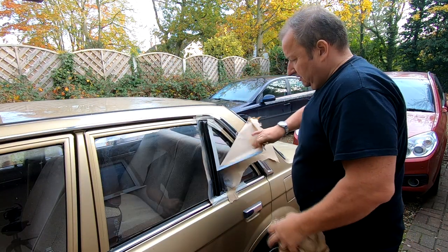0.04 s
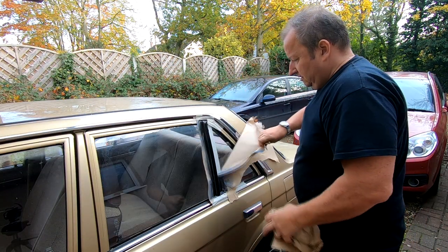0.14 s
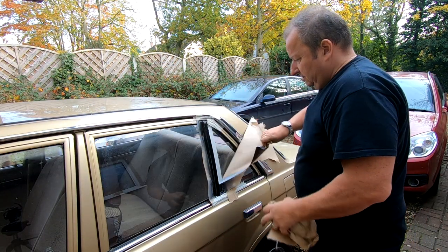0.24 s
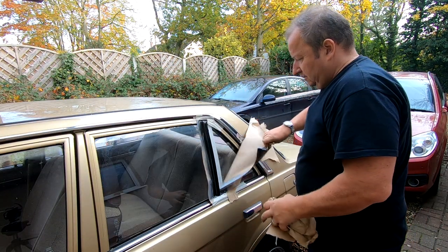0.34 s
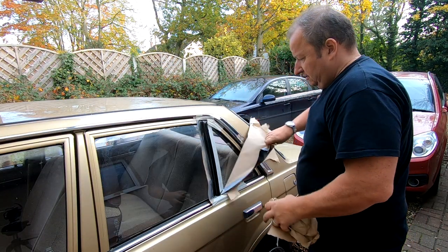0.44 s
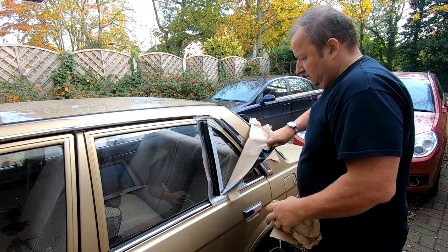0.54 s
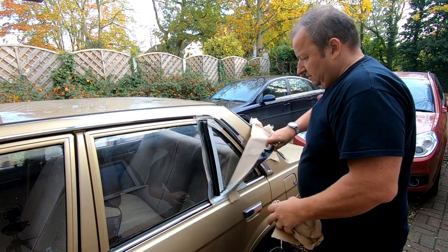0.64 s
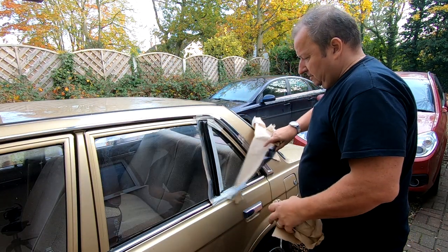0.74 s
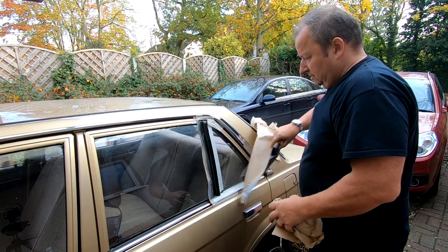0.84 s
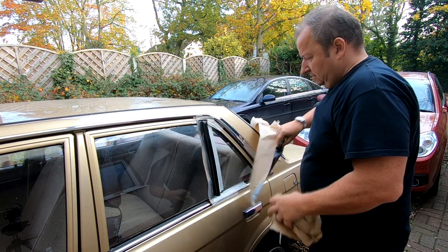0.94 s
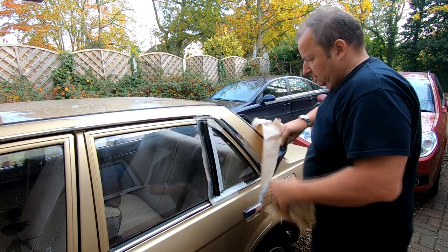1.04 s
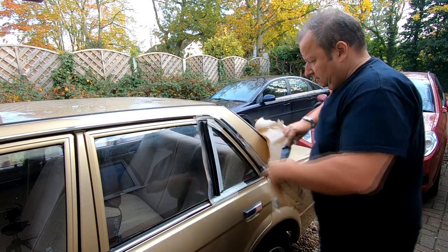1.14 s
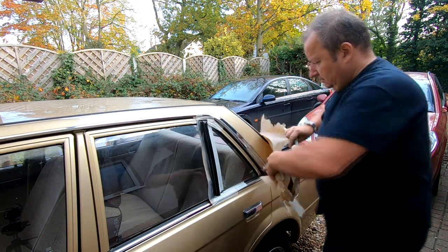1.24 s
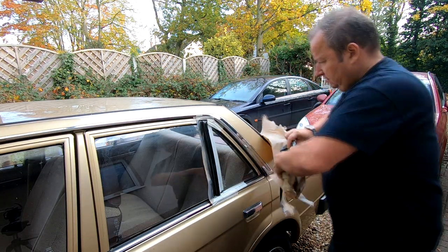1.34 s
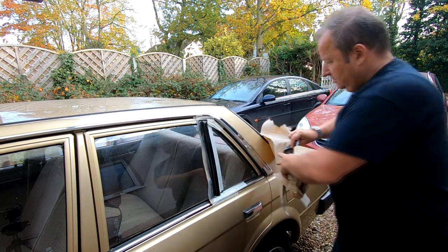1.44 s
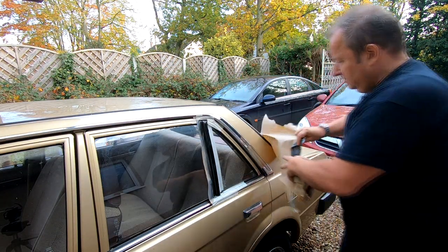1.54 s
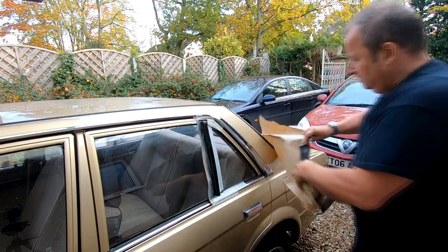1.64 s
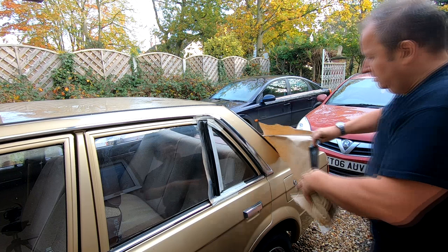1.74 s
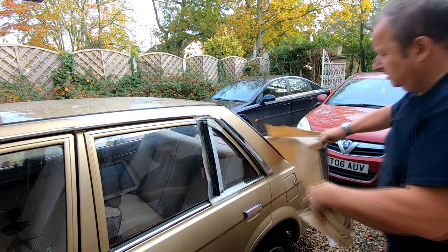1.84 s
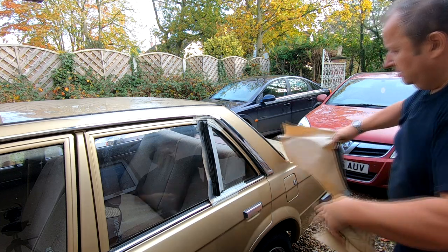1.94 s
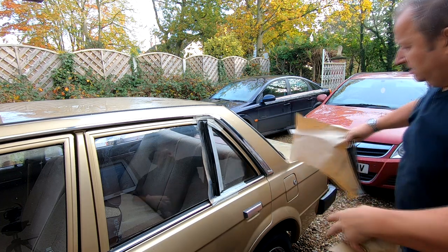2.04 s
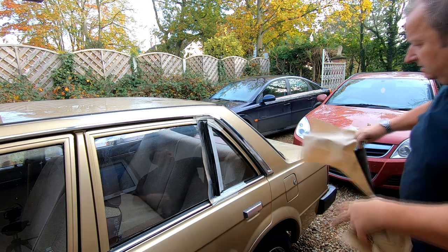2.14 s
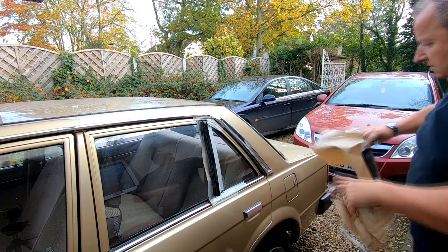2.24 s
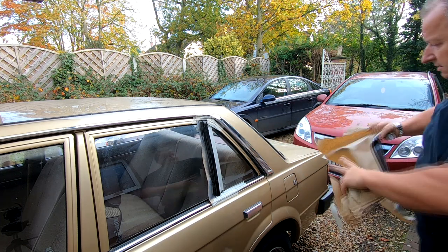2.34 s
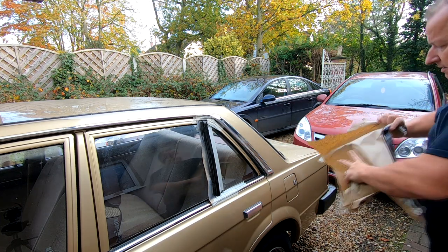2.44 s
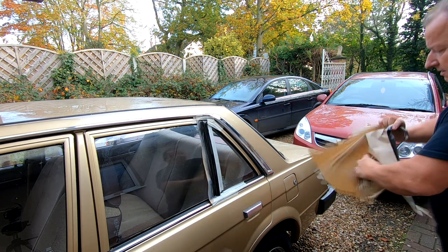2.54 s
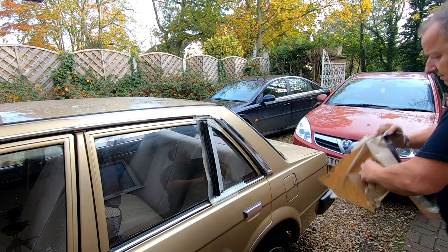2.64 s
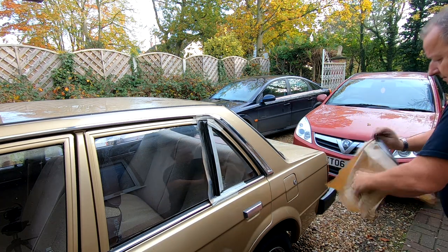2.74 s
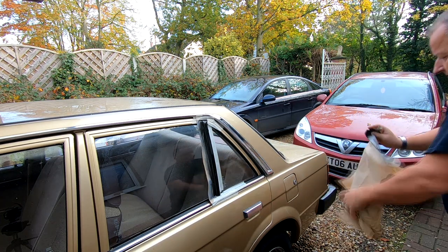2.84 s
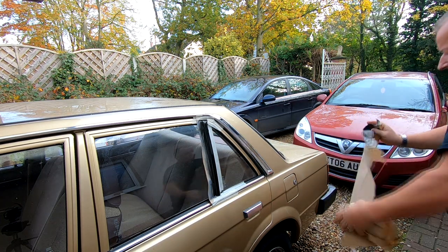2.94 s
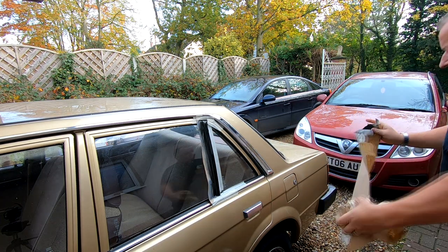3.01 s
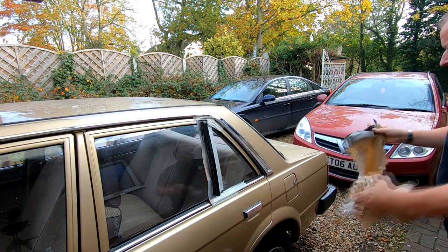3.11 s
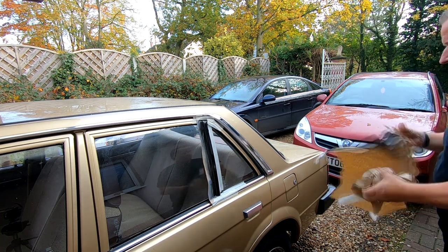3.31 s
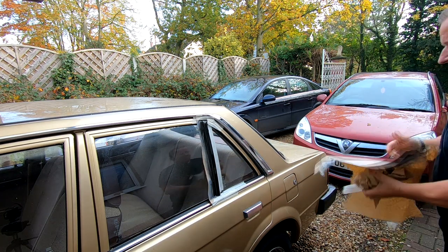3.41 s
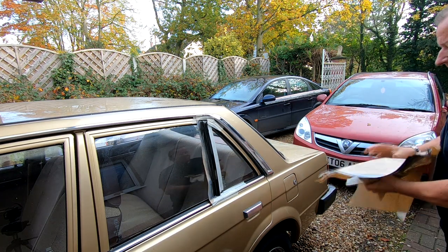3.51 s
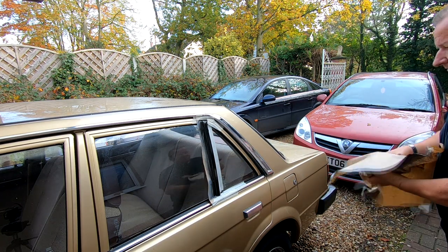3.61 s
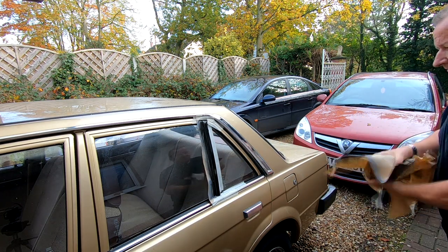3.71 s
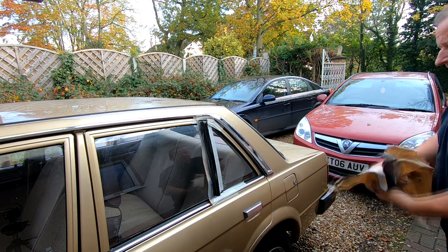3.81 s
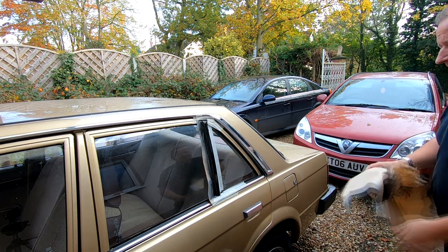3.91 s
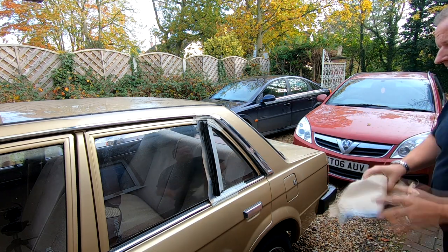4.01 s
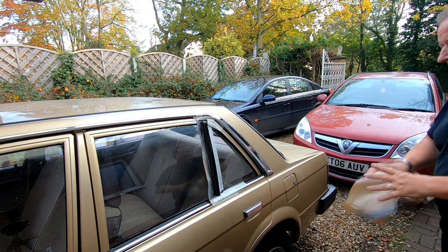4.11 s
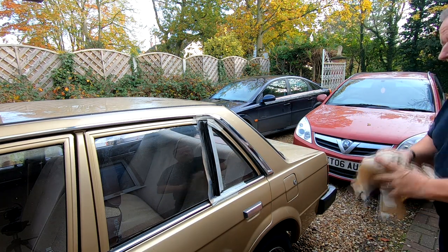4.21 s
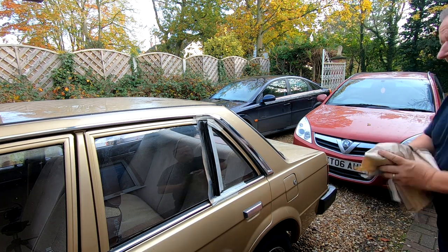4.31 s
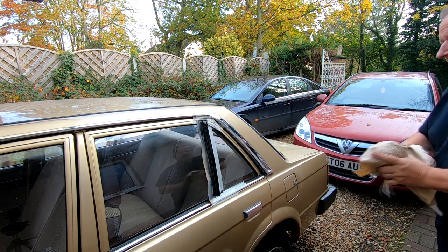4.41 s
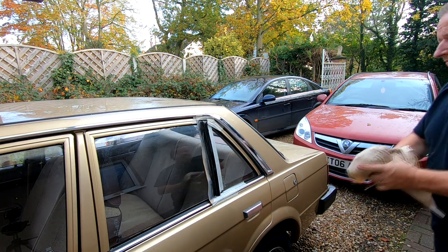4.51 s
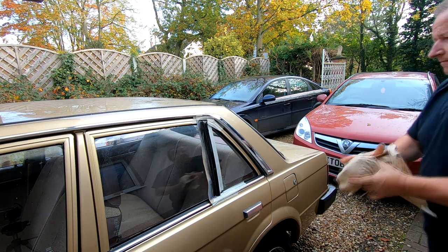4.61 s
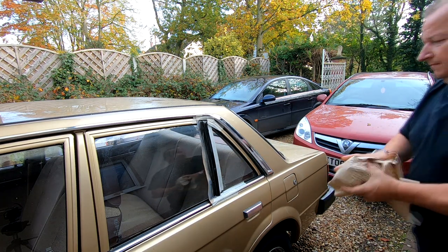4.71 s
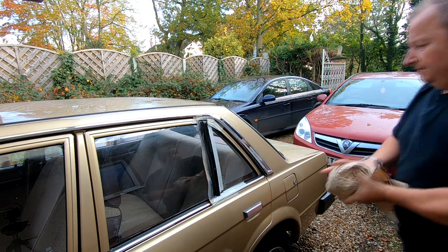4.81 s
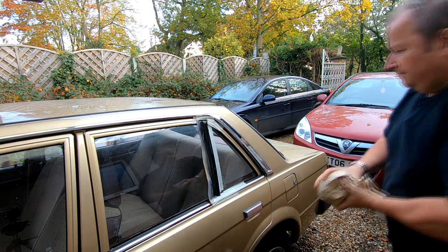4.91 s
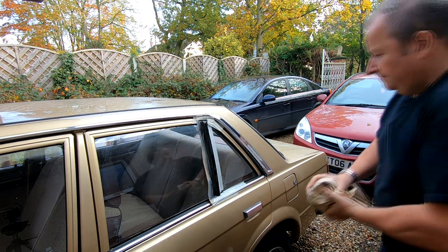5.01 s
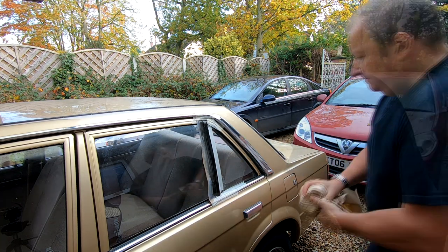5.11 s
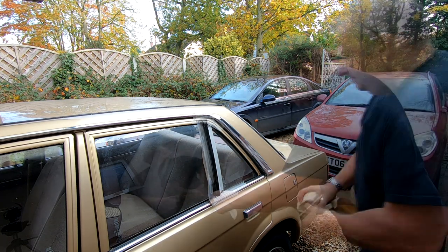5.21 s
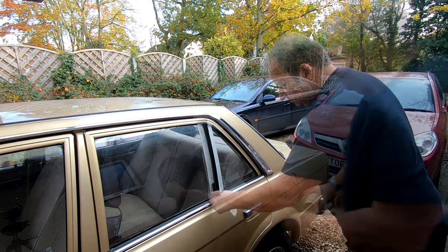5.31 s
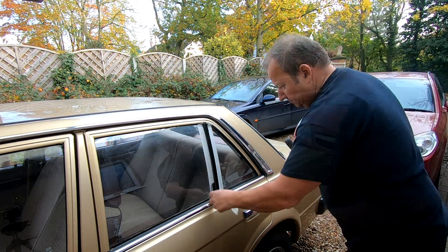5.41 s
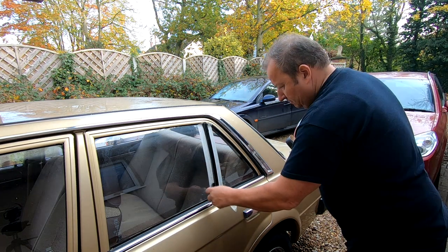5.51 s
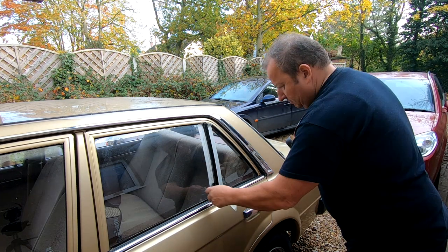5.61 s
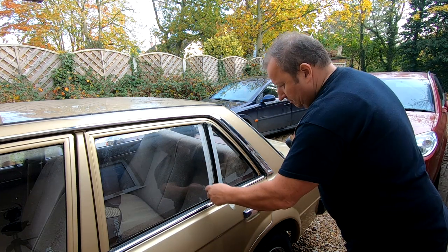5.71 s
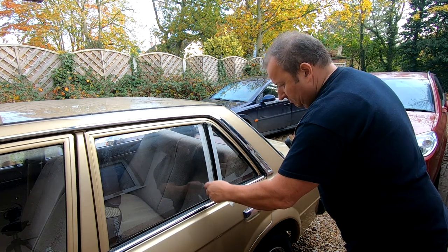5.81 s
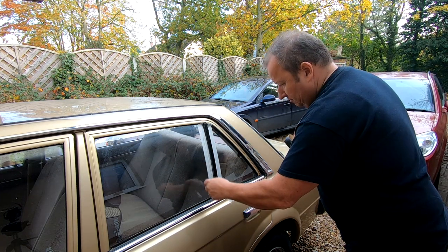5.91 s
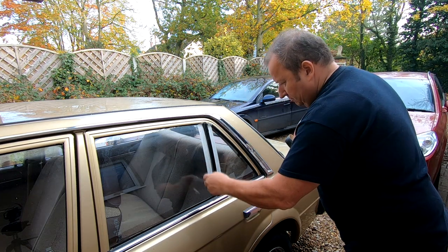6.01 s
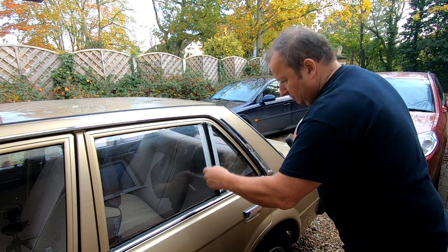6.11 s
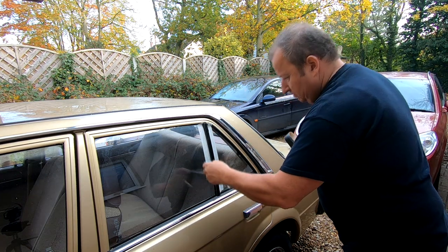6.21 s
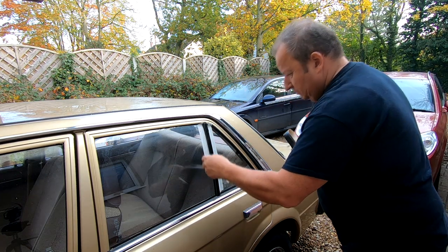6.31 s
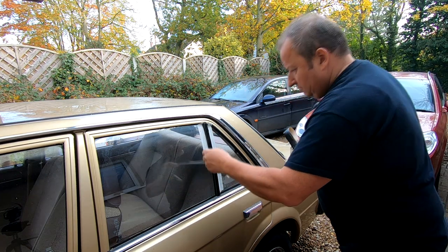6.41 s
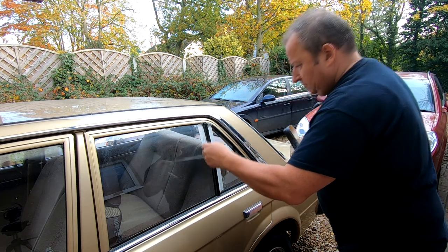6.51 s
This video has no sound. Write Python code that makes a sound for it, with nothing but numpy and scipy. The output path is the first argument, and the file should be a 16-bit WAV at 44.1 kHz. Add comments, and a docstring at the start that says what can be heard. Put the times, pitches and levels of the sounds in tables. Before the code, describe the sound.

Masking paper rustles and snaps as it is ripped off a car and crumpled by hand, then a strip of tape peels away.

```python
"""Masking paper is ripped off a car window frame and crumpled by hand on a driveway.
Creases buckle in clumps of tiny cracks, with louder snaps among them; each crack is an impulse that
excites the damped modes of the sheet. Paper slides over paper and pushes puffs of air. Then a strip of
tape is peeled: its glue threads fizz and the door panel drones. Far traffic hums below."""
import sys
import numpy as np
from scipy import signal
from scipy.fft import rfft, irfft
from scipy.io import wavfile

SR = 44100
rng = np.random.default_rng(int(sys.argv[2]) if len(sys.argv) > 2 else 0)


def store_pcm(level_fs):
    """Save levels as 16-bit WAV."""
    pcm = np.round(np.clip(level_fs, -1, 1) * 32767).astype(np.int16)
    wavfile.write(sys.argv[1], SR, np.atleast_2d(pcm).T)


N = 288855

# The sheet, from taut to balled up. Each row: time in seconds; crackle, edge and knock pitch in Hz;
# crackle level of the sheet merely held in dB; low boom and crisp treble in dB over that crackle.
SHEET = [(0, 2650, 6300, 650, -47.5, -12, 0), (.25, 2450, 6040, 724, -45, 6, -3),
         (.42, 2660, 6100, 800, -45.5, 2.5, -9), (.6, 2480, 5300, 750, -51, 5, -1),
         (.72, 2720, 5800, 744, -53, 2, -4), (.9, 2380, 5500, 750, -62.5, 10.5, -7),
         (1.25, 2500, 5400, 610, -64, 1, -11), (1.5, 2050, 6640, 547, -57, -0.5, -14),
         (1.75, 2460, 6140, 516, -35, 5.5, -11), (2.1, 2600, 5370, 510, -59.5, 1.5, -11),
         (2.55, 2390, 5600, 660, -52, -2.5, -12), (2.9, 1900, 6200, 596, -57, -3, -11),
         (3.3, 2200, 5960, 674, -45.5, -1, -11.5), (3.8, 2020, 6700, 676, -56, -8, -15),
         (4.1, 1930, 6840, 443, -60.5, 3, -18), (4.45, 2150, 7300, 477, -42, 2, -9),
         (4.75, 2250, 6600, 700, -48, -3, -10), (5.2, 2190, 6400, 690, -67, 0, -4),
         (5.35, 3200, 6250, 700, -58, -3, -2), (5.75, 3200, 6100, 700, -69, 1, -2.5)]
# Grips and pulls of the hands. Each row: start and hold in seconds, crackle level in dB, swell over
# the hold in dB, boom and crisp treble in dB over the crackle.
GRIPS = [(0, 0.12, -35.5, -10, -0.5, -14), (0.171, 0.084, -38.5, 11, -6.5, -5),
         (0.368, 0.11, -40, 0, -14, -5), (.58, 0.14, -44.5, 0, -2, -5), (0.71, 0.098, -30.5, 2, -6, -14.5),
         (1.075, 0.11, -49, 6, -2.5, -11.5), (1.231, 0.088, -43, -4.5, 2.5, -13),
         (1.615, 0.11, -48, 3, -6, -10.5), (1.737, .13, -33, -11, -18.5, -10.5),
         (1.872, 0.07, -32.5, 2, -5, -7), (1.943, 0.061, -38.5, -3, -2, -13), (2.536, .06, -40, 4, -2, -16),
         (2.601, 0.14, -38, -10.5, -2, -10.5), (3.27, 0.09, -46, 0, -2, -15),
         (3.439, 0.12, -40, 3, -2.5, -14.5), (3.595, 0.086, -37, 5, -0.5, -9.5),
         (3.707, 0.088, -28.5, 2.5, -0.5, -10), (3.839, 0.055, -34, -12, -2, -13),
         (3.901, 0.027, -42, 1.5, -2, -3.5), (3.966, .06, -49, -3.5, 2, -20),
         (4.239, 0.089, -31, -1, 0.5, -7.5), (4.336, 0.096, -35.5, 7, -1, -9.5),
         (4.495, 0.15, -37, 0.5, -3, -9.5), (4.686, 0.11, -33, 1, -3, -10.5),
         (4.823, .08, -24.5, -4.5, -5.5, -14.5), (4.904, 0.17, -31, -8, -1.5, -9),
         (5.07, 0.16, -49.5, 2.5, -1, -9), (5.515, 0.07, -55.5, 1, -3, -2)]
# Snaps along folds. Each row: start and length in seconds, crackle level in dB, low knock and
# crisp edge in dB over the crackle.
SNAPS = [(.068, 0.0027, -26.5, -21, -9), (0.092, 0.0021, -33, -19, -2), (0.151, 0.002, -33.5, -2, -4),
         (.1666, .01, -37, -5, -4), (0.18, 0.0026, -28.5, -5, -9), (0.2167, 0.0021, -25, -2.5, -25),
         (0.222, 0.0089, -24.5, -11, -15), (.236, 0.0033, -23, -13, -21),
         (0.2463, 0.032, -19, -11.5, -13.5), (0.2974, .011, -21.5, -10.5, -12.5),
         (0.3454, 0.0022, -27, 1, -22), (0.358, 0.011, -15.5, -14, -13),
         (0.386, 0.017, -18.5, -11.5, -13.5), (0.4095, 0.009, -19, -10, -16),
         (0.422, 0.022, -19.5, -16, -14), (0.4697, 0.0013, -21.5, -1, -10), (.485, 0.0071, -23, -6, -15),
         (0.517, .0024, -33, -13, -24), (.532, 0.002, -21.5, -6.5, -15), (0.547, 0.0019, -27, -11, -17),
         (0.584, .0031, -25, -7, -26), (0.594, 0.011, -24, -13, -29), (0.623, 0.0043, -27.5, -8, -16),
         (.6336, 0.0038, -26, -17, -27), (0.646, 0.0017, -24.5, -16, -23), (0.653, 0.0066, -27, -10.5, -23),
         (0.68, 0.00095, -24, -6, -20), (0.717, 0.018, -27, -9, -15), (0.743, 0.029, -27.5, -6, -20),
         (0.755, 0.0012, -20.5, -5, -30), (0.777, 0.0015, -15.5, -5, -34), (0.785, 0.011, -25.5, -6, -35),
         (0.799, 0.0015, -14.5, -8, -30), (0.8054, 0.0019, -18, -4, -23), (.8174, 0.016, -30.5, -12, -20),
         (0.8753, 0.0039, -28, -16, -13), (.943, .002, -42, -6, -15), (0.997, 0.0021, -35, -5, -25),
         (1.007, 0.0039, -35.5, -11, -20), (1.0316, 0.0028, -28.5, -4, -6), (1.054, 0.0024, -33, -1.5, -22),
         (1.08, .0131, -35, -0.5, -5.5), (1.102, .0027, -42, -12, 5), (1.152, 0.0085, -30.5, -21, -27),
         (1.227, 0.029, -27.5, -6, -12.5), (1.254, 0.02, -32, -6.5, -13), (1.304, 0.0046, -42, 1.5, -25),
         (1.35, 0.0018, -38, -10, -25), (1.412, 0.0026, -42, 2, -29), (1.454, 0.0066, -36.5, 7, -9),
         (1.5763, 0.0022, -28, -0.5, -1), (1.629, 0.0017, -27.5, 5, -4.5), (1.654, 0.0051, -37.5, -6, -2),
         (1.8768, 0.0043, -12, -7, -24), (1.888, 0.004, -16, -4, -22), (1.894, 0.0024, -13, -5, -18),
         (1.904, 0.011, -15, -2.5, -17), (1.9192, 0.02, -18.5, -8, -18), (2.203, 0.0052, -45, -2, -22),
         (2.248, .002, -48, -3, -4), (2.277, 0.0022, -43, -1, -10), (2.29, 0.0031, -39, -8, -19),
         (2.328, 0.0046, -42, -6, -11), (2.385, 0.0021, -40, 3, -19), (2.4276, 0.0048, -42.5, 1, -12),
         (2.518, 0.014, -34.5, -2, -20), (2.549, 0.03, -25, -6.5, -8.5), (2.572, 0.022, -27.5, -17, -16),
         (2.803, 0.0023, -35.5, -8, -19), (2.82, .003, -53, -5, -2), (2.84, 0.0074, -47.5, -5, -7),
         (2.9629, .0113, -48, -10, -20), (3.0364, .0045, -43.5, 9, -11), (3.0663, 0.0087, -39.5, -10, -12),
         (3.171, 0.0037, -39, -7, -27), (3.2017, 0.0021, -25, -14, -24), (3.308, 0.0038, -33.5, 4, -23),
         (3.324, 0.0029, -28, 1, -5.5), (3.334, 0.0056, -31.5, 2.5, -24), (3.344, 0.0059, -30.5, 2, -21),
         (3.359, .0032, -26.5, -15, -18), (3.426, 0.024, -28.5, -8, -11.5), (3.45, 0.0093, -30, -2, -10),
         (3.478, 0.0036, -23.5, -8, -16), (3.4866, 0.0033, -25, -11, -29), (3.531, 0.0013, -27.5, -3, -20),
         (3.5848, 0.012, -23, -7.5, -19), (3.6493, 0.012, -24.5, -7.5, -9.5), (3.6654, .02, -26, -3, -6.5),
         (3.692, 0.0014, -21, -6, -7), (3.7235, 0.0011, -21, -4, -7), (3.7496, 0.0051, -22.5, 3.5, -12),
         (3.7916, 0.0059, -26.5, -6, -9), (3.804, .0049, -34, 5.5, -17), (3.815, 0.0021, -25.5, 2, -20),
         (3.855, 0.002, -26.5, 2.5, -18), (3.904, 0.0032, -26, -6.5, -22), (3.927, 0.019, -39.5, -5, -11),
         (4.0866, 0.0087, -44, 4.5, -37), (4.182, 0.0052, -38.5, -10, -21), (4.209, 0.025, -21.5, -3, -16),
         (4.231, 0.0077, -19, -1.5, -10), (4.262, .0041, -21, -3, -13), (4.3023, 0.0026, -22.5, -15, -6),
         (4.3605, 0.006, -22.5, -6.5, -16), (4.3695, .002, -20.5, -6, -9),
         (4.3897, 0.0041, -14.5, -11.5, -13), (4.421, 0.0016, -23, -1, -5), (4.428, 0.0051, -20, 0, -13),
         (4.444, .006, -19.5, -3.5, -12), (4.469, 0.0028, -21.5, -9, -14), (4.56, .004, -26.5, -6.5, -12),
         (4.581, 0.0074, -23, -9, -21), (4.625, 0.0015, -20.5, 3, -15), (4.635, 0.008, -29, -3.5, -10),
         (4.708, 0.0071, -27.5, -3.5, -10), (4.7372, 0.0028, -18, -8, -9.5),
         (4.7685, 0.0024, -26.5, 1, -24), (4.784, 0.0082, -21.5, -5, -15), (4.8672, 0.025, -22, -10, -8),
         (4.9624, 0.0016, -21, -2.5, -13), (4.989, 0.0011, -20.5, -1, -10),
         (5.0845, 0.0015, -30, -4.5, -2.5), (5.182, 0.019, -37, -7, -11.5), (5.236, 0.0046, -48, 5, 4),
         (5.2472, 0.0028, -56, 6, -4), (5.3537, 0.0048, -56, 11, 10), (5.372, 0.0049, -60, 11, 1),
         (5.3985, .0043, -61, 7, 11), (5.423, .003, -62, -1, 9), (5.438, .003, -61, 1, 6),
         (5.486, 0.0024, -54, 6, 5), (5.5084, 0.037, -46, 6, 4), (5.545, 0.024, -44, 2, 3.5)]
# A taut sheet rings in a narrow band, a crumpled one in a broad band.
# Each row: time in seconds, spread about the crackle pitch in octaves.
CRACKLE_SPREAD = [(0, 0.26), (.9, 0.12), (1.2, 0.49), (2, 0.26), (3, 0.52), (5.75, 0.51)]
# Spectra of the paper's low boom and crisp treble. Each row: frequency in Hz, relative level in dB.
BOOM_SPECTRUM = [(70, -15.5), (150, -9), (400, 0.5), (1000, 0), (1500, 1), (3000, -47)]
CRISP_SPECTRUM = [(3000, -14), (4800, 12.5), (7000, 4), (9000, -3), (12000, -9), (16000, -21)]
# Paper sliding over paper. Each row: start and length in seconds, pitch in Hz, level in dB.
SLIDES = [(1.64, 0.14, 7550, -51.5), (2.697, 0.087, 7500, -76), (2.837, 0.074, 8850, -71),
          (3.06, 0.075, 10500, -69), (3.22, .08, 10500, -72), (5.058, .1, 7600, -64),
          (5.275, .2, 6550, -70), (5.513, 0.067, 6540, -44)]
# Air pushed by the flapping sheet. Each row: start in seconds, level in dB.
PUFFS = [(.29, -53), (.44, -52), (.75, -68), (1.24, -45), (1.59, -48), (1.9, -43), (2.21, -53), (2.6, -52),
         (3.12, -50), (3.47, -41.5), (3.59, -41), (3.79, -36), (3.94, -48), (4.23, -30), (4.46, -45),
         (4.89, -38), (5.22, -50), (5.53, -56)]
# Tape peeled off the pillar. Each row: time in seconds, hiss level in dB, panel drone level in dB.
PEEL = [(5.68, -75, -73), (5.72, -59.5, -64), (5.78, -49, -51), (5.91, -53.5, -54), (5.97, -48, -51),
        (6.1, -43, -46), (6.2, -46, -44.5), (6.27, -41.5, -41.5), (6.44, -45.5, -44), (6.55, -40, -36)]
# Spectrum of parting glue threads. Each row: frequency in Hz, relative level in dB.
GLUE_SPECTRUM = [(710, -38), (1200, -16), (1370, -35), (1570, -11), (1890, -12), (2180, -8), (2510, -11),
                 (2890, -8.5), (4360, -4), (5180, 2.5), (6230, -8), (6800, -5.5), (8820, -14),
                 (11600, -16.5), (16000, -23)]
# Modes of the door panel. Each row: frequency in Hz, bandwidth in Hz, relative gain in dB.
PANEL_MODES = [(155, 14.5, 4.5), (420, 136, -4.5), (804, 17, -9.5)]
# Colour laid over the crackle, snaps and slides. Each row: frequency in Hz, gain in dB.
PAPER_COLOUR = [(100, 9), (300, 0.5), (2200, -0.5), (2900, -3), (3800, 1), (4200, 1.5), (4700, -2),
                (6000, -3), (16000, 4.5)]
# Spectrum of far traffic. Each row: frequency in Hz, relative level in dB.
TRAFFIC_SPECTRUM = [(15, -51), (25, -17), (87, -15), (206, 8), (256, -1), (560, -13), (624, -14.5),
                    (840, -19.5), (1890, -38.5), (4250, -31.5), (8140, -43), (11900, -46), (16000, -48)]
# Rise and fall of the traffic. Each row: time in seconds, relative level in dB.
TRAFFIC_LEVEL = [(0.0, -51), (0.35, -47.5), (1.11, -51.5), (1.48, -43.5), (1.66, -48.5), (3.12, -50.5),
                 (3.52, -46.5), (4.78, -48.5), (5.65, -54.5), (6.55, -49.5)]


def rustle(count=12000, spread_db=1.5, clump_db=2.5):
    """Buckling: small creases give at random moments, in clumps, louder while the hands grip."""
    duration = SHEET[-1][0]
    t = rng.uniform(0, duration, count)
    pitch_hz, _, _, held_db, held_boom_db, held_crisp_db = at_time(SHEET, t)
    start, hold, level_db, swell_db, boom_db, crisp_db = np.transpose(GRIPS)
    levels_db = [gestures(t, start, hold, level_db + grip_db, swell_db,
                          rise_db_per_s=502, fall_db_per_s=328, rest_db=held_db + rest_db)
                 for grip_db, rest_db in ((0, 0), (boom_db, held_boom_db), (crisp_db, held_crisp_db))]
    clumps = (drift(18.6) + 0.27 * drift(110))[(t * SR).astype(int)]
    size = rms_one(from_db(spread_db * np.minimum(rng.exponential(1, count), 4) + clump_db * clumps))
    size *= np.sqrt(SR * duration / count)   # unit mean power
    return cracks(t, *[size * from_db(db) for db in levels_db], pitch_hz, colour_db=3.5)


def snaps(count=22, spread_db=16, onset_share=0.091, knock_octaves_per_db=0.04):
    """Cascading buckling: a snap runs along a fold as a fading string of uneven cracks."""
    start, length, level_db, knock_db, edge_db = np.transpose(SNAPS)[..., None]
    jitter, weakness = np.hsplit(rng.random((len(SNAPS), 2 * count)), 2)
    along = (np.arange(count) + jitter) / count
    fade_db = 9.75 - 250 * length   # longer runs fade less
    size = from_db(-fade_db * along - spread_db * weakness) * np.minimum(along / onset_share, 1)
    size *= from_db(level_db) * np.sqrt(length * SR / np.sum(size ** 2, axis=1, keepdims=True))
    gains = [(size * from_db(db)).ravel() for db in (0, knock_db, edge_db)]
    t = (start + length * along).ravel()
    pitch_hz, edge_hz, knock_hz, *_ = at_time(SHEET, t)
    # Knocks above -25.5 dB ring higher than the sheet's knock pitch, weaker ones lower.
    knock_hz *= 2 ** (knock_octaves_per_db * np.repeat(level_db + knock_db + 25.5, count))
    # Louder snaps carry more broad treble beside the edge ring.
    broad = 0.87 * from_db(0.5 * np.repeat(level_db + 23, count))
    return cracks(t, *gains, pitch_hz, colour_db=2.0, knock_hz=knock_hz, edge_hz=edge_hz, broad=broad)


def cracks(t, crackle_gain, boom_gain, crisp_gain, pitch_hz, colour_db,
           knock_hz=None, edge_hz=None, broad=None):
    """Modal superposition: each crack kicks the damped paper modes, each with its own random strength."""
    modes = np.geomspace(90, 14500, 30)[:, None]   # Hz
    widths = 0.34 * modes
    octaves, = at_time(CRACKLE_SPREAD, t)
    middle = bump(modes, pitch_hz, octaves)
    low = from_db(at_hz(BOOM_SPECTRUM, modes)) if knock_hz is None else bump(modes, knock_hz, octaves=1)
    high = from_db(at_hz(CRISP_SPECTRUM, modes))
    if edge_hz is not None:
        high = high * (broad + bump(modes, edge_hz, octaves=0.48))
    crackle, boom, crisp = [shape / np.sqrt(np.sum(shape ** 2 * np.pi * widths / 2 / SR, axis=0))
                            for shape in (middle, low, high)]   # equal energy
    kicks = np.sqrt((crackle * crackle_gain) ** 2 + (boom * boom_gain) ** 2 + (crisp * crisp_gain) ** 2)
    strength, polarity = rng.standard_normal((len(t), len(modes), 2)).T
    kicks *= rms_one(from_db(colour_db * strength)) * np.sign(polarity)
    onsets = np.clip((t * SR).astype(int), 0, N - 1)
    return sum(steep_resonance(np.bincount(onsets, kick, N), hz, width)
               for kick, hz, width in zip(kicks, modes[:, 0], widths[:, 0]))


def slides(width_hz=1200):
    """Sliding friction: paper on paper gives a soft swell of scratchy noise in one thin band."""
    out = np.zeros(N)
    for start, length, hz, db in SLIDES:
        along = (np.arange(N) / SR - start) / length
        on = (along > 0) & (along < 1)
        scratch = rng.standard_normal(SR // 2)[:on.sum()] * from_db(3.0 * drift(70)[on])
        swish = rms_one(steep_resonance(scratch, hz, width_hz))
        out[on] += from_db(db) * swish * np.sqrt(np.sin(np.pi * along[on]))
    return out


def puffs(hold_s=0.016, band_hz=(55, 200)):
    """Air displacement: the flapping sheet pushes out soft pulses of low noise."""
    t = np.arange(0, N, 64) / SR
    start, peak_db = np.transpose(PUFFS)
    level_db = gestures(t, start, np.full_like(start, hold_s), peak_db, swell_db=np.zeros_like(start),
                        rise_db_per_s=443, fall_db_per_s=196, rest_db=-61.5)
    air = butterworth(rng.standard_normal(N), band_hz, "band")
    return from_db(np.interp(np.arange(N) / SR, t, level_db)) * rms_one(air)


def peel(threads_per_s=9000, rasp_db=2.0):
    """Adhesive failure: glue threads let go in a dense fizz, and the pull drives the door panel's modes."""
    t = np.arange(N) / SR
    hiss_db, drone_db = at_time(PEEL, t)
    pulling = t > PEEL[0][0]
    sizes = from_db(4.5 * np.minimum(rng.exponential(1, N), 4) + 1.2 * drift(60))
    breaks = rng.random(N) < threads_per_s / SR
    threads = coloured(breaks * rng.choice([-1, 1], N) * sizes, GLUE_SPECTRUM)
    edges_hz = np.geomspace(700, 15500, 11)
    # Each band wavers on its own, so the colour keeps shifting.
    fizz = rms_one(sum((-1) ** k * from_db(rasp_db * drift(8.9)) * butterworth(threads, band, "band")
                       for k, band in enumerate(zip(edges_hz, edges_hz[1:]))))
    pull = rng.standard_normal(N) * from_db(1.5 * drift(29))
    drone = rms_one(sum(from_db(db) * resonance(pull, hz, width) for hz, width, db in PANEL_MODES))
    return pulling * (from_db(hiss_db) * fizz + from_db(drone_db) * drone)


def driveway_echoes(x, level_db=-11, t60_s=0.13, delay_s=0.003):
    """Scattering: reflections off cars and fence merge into a short, exponentially decaying tail."""
    t = np.arange(SR // 2) / SR
    tail = rng.standard_normal(len(t)) * from_db(-60 * t / t60_s) * (t > delay_s)
    tail = butterworth(tail, 19000, "low", order=1)
    return from_db(level_db) * signal.fftconvolve(x, tail / np.sqrt(np.sum(tail ** 2)))[:N]


def traffic(gain_db=3.0, waver_db=1.8):
    """Amplitude-modulated noise: the low hum of a far road wavers a little in level."""
    hum_db, = at_time(TRAFFIC_LEVEL, np.arange(N) / SR)
    envelope = from_db(hum_db + gain_db + waver_db * drift(8))
    return envelope * rms_one(coloured(rng.standard_normal(N), TRAFFIC_SPECTRUM))


def gestures(t, start, hold, level_db, swell_db, rise_db_per_s, fall_db_per_s, rest_db):
    """Power addition: the level in dB of movements that rise, hold and die away over a resting level."""
    since, hold = t - start[:, None], hold[:, None]
    held_db = level_db[:, None] + swell_db[:, None] * np.clip(since / hold, 0, 1)
    each_db = held_db - rise_db_per_s * np.maximum(-since, 0) - fall_db_per_s * np.maximum(since - hold, 0)
    return 10 * np.log10(np.sum(from_db(each_db) ** 2, axis=0) + from_db(rest_db) ** 2)


def resonance(x, hz, width):
    """Damped resonator: two poles, with unit gain at the peak."""
    r = np.exp(-np.pi * width / SR)
    feedback = [1, -2 * r * np.cos(2 * np.pi * hz / SR), r * r]
    return signal.lfilter([(1 - r * r) / 2, 0, (r * r - 1) / 2], feedback, x + 1e-18)


def steep_resonance(x, hz, width):
    """Two resonators in cascade give steeper skirts."""
    return resonance(resonance(x, hz, width), hz, width)


def butterworth(x, hz, kind, order=2):
    """Filtering with a maximally flat passband."""
    return signal.sosfilt(signal.butter(order, hz, kind, fs=SR, output="sos"), x)


def coloured(x, spectrum):
    """Filtering by multiplication in the frequency domain."""
    hz = np.maximum(np.fft.rfftfreq(N, 1 / SR), 10)
    return irfft(rfft(x) * from_db(at_hz(spectrum, hz)), N)


def drift(rate_hz):
    """Random fluctuation: low-passed noise of unit rms."""
    r = np.exp(-2 * np.pi * rate_hz / SR)
    return rms_one(signal.lfilter([1], [1, -2 * r, r * r], rng.standard_normal(N + SR))[SR:])


def bump(hz, centre_hz, octaves):
    """Bell-shaped gain on a log-frequency axis."""
    return np.exp(-.5 * (np.log2(hz / centre_hz) / octaves) ** 2)


def at_time(rows, t):
    """Linear interpolation of a table's columns at times t."""
    times, *columns = np.transpose(rows)
    return [np.interp(t, times, column) for column in columns]


def at_hz(spectrum, hz):
    """Interpolation of a spectrum on a log-frequency axis."""
    points_hz, db = np.transpose(spectrum)
    return np.interp(np.log(hz), np.log(points_hz), db)


def from_db(db):
    """Decibels to amplitude ratio."""
    return 10 ** (np.asarray(db) / 20)


def rms_one(x):
    """Normalisation to unit rms."""
    return x / np.sqrt(np.mean(x ** 2) + 1e-20)


def scene(side_db=-38, side_treble_db=-21):
    """Superposition: all sources reach both channels alike, save a faint width that grows in the treble."""
    paper_and_tape = coloured(rustle() + snaps() + slides(), PAPER_COLOUR) + peel()
    mid = paper_and_tape + driveway_echoes(paper_and_tape) + traffic() + puffs()
    flicker = mid * drift(16)
    side = from_db(side_db) * flicker + from_db(side_treble_db) * butterworth(flicker, 6000, "high")
    return mid + side * [[1], [-1]]


def record(dry, stopband_hz=16500):
    """Band limiting: a steep low-pass filter removes the highest treble."""
    return signal.sosfilt(signal.cheby2(12, 60, stopband_hz, fs=SR, output="sos"), dry)


dry = scene()
out = record(dry)
store_pcm(out)
```